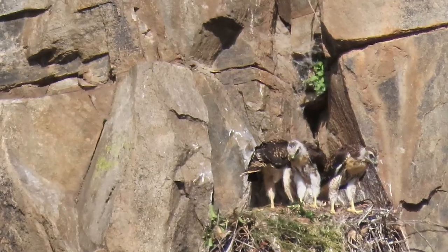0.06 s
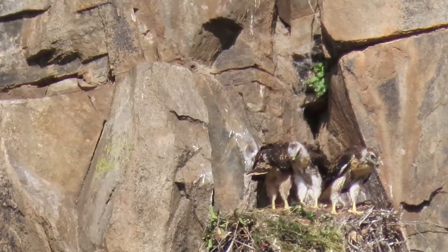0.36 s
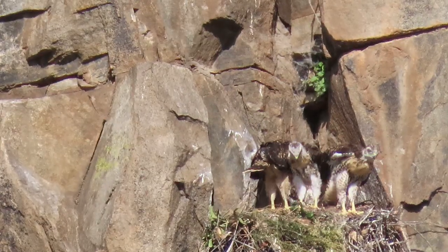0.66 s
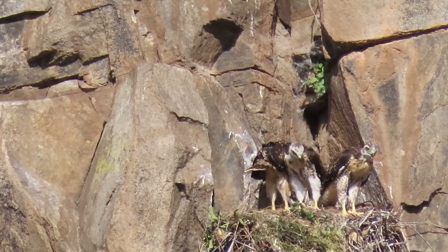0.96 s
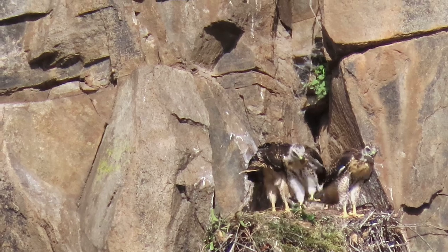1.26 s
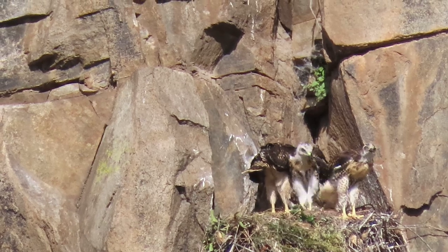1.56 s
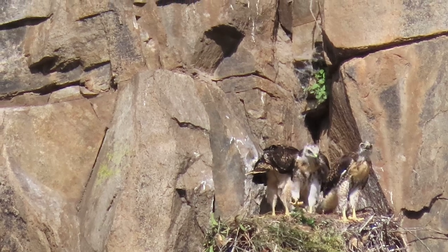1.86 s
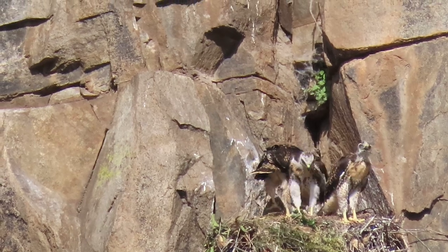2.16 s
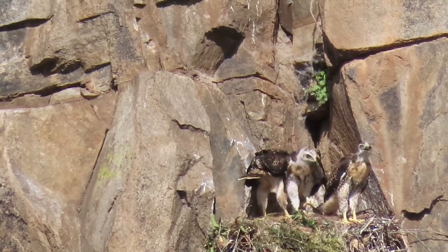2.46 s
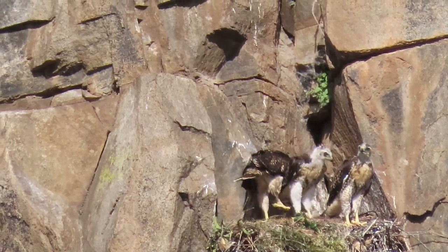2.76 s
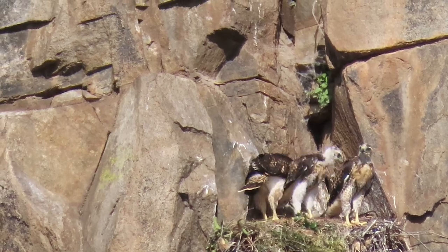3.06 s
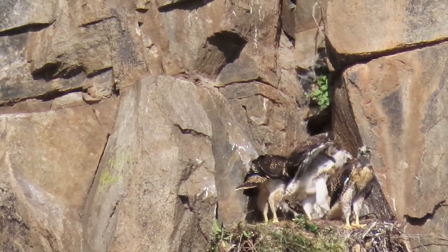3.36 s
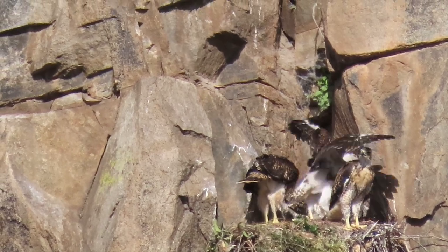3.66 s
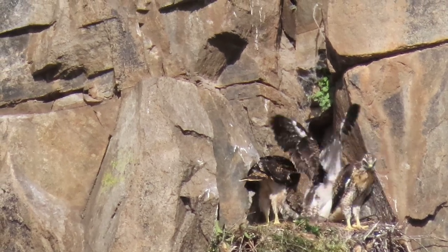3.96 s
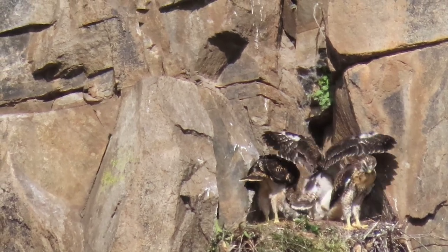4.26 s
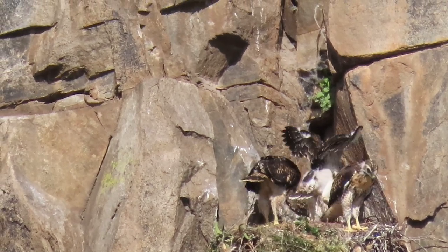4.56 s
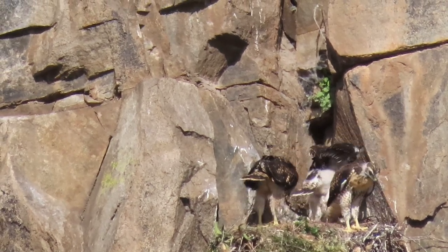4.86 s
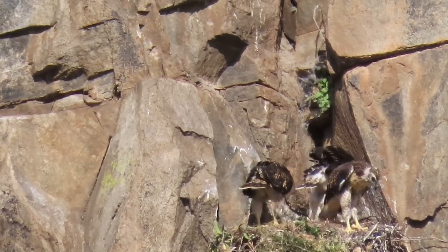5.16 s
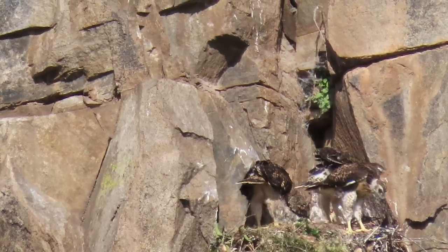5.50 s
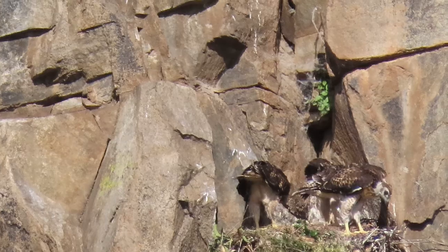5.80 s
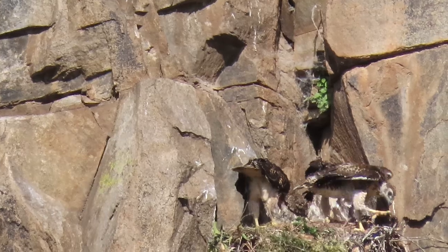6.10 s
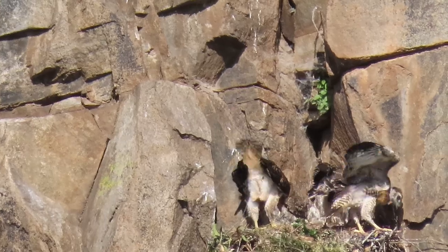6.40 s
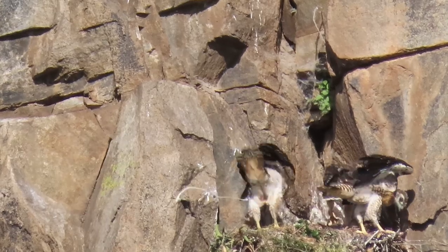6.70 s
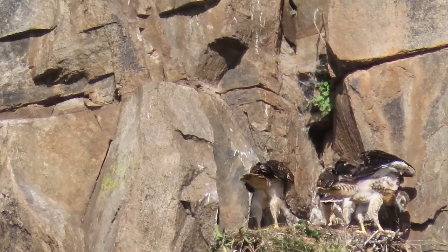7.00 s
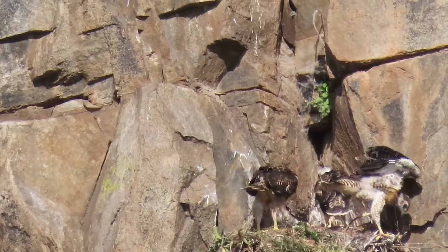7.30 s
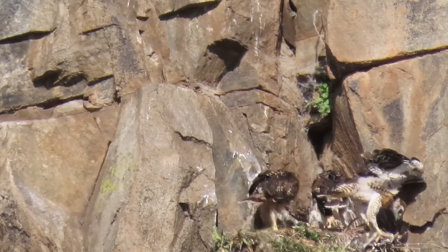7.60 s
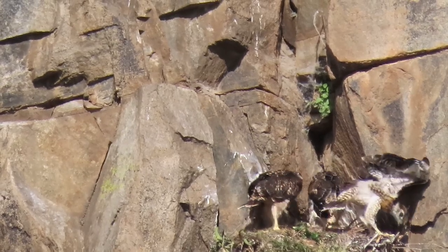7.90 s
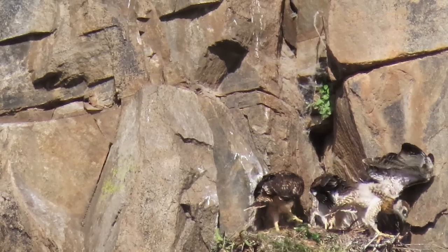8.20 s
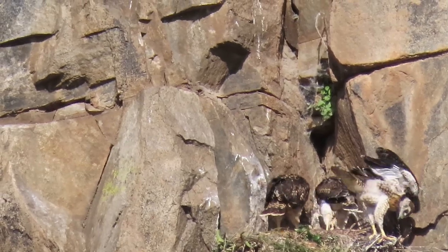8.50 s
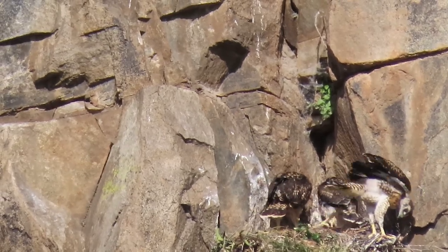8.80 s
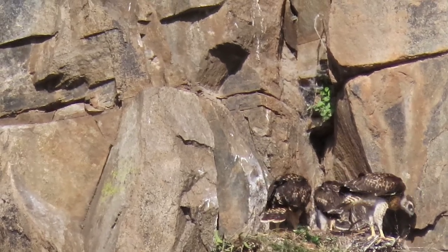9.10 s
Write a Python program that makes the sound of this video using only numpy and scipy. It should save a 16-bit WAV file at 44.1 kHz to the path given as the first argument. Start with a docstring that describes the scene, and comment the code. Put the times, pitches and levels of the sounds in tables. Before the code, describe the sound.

Distant traffic rushes steadily outdoors while a breeze buffets the microphone in low puffs. Small songbirds twitter in separate bursts, their thin whistles echoing lightly off a rock face. A soft singer comes first, then a dull knock, perhaps a wing flap, as a louder bird sings over distant chatter. The nearest bird follows with a quick run of chirrups, and a strong wind puff thuds just before the end.

```python
"""Distant traffic rushes and drones throughout, and a breeze buffets the microphone in low puffs.
Small songbirds twitter below a rock face, which scatters their thin, gliding whistles back.
A soft singer enters after a second; a louder one follows over distant chatter, and near 4 s come
a dull knock and a faint hollow tone, perhaps a wing flap. The nearest bird sings from about 7 to 8 s,
and the strongest puff thuds just before the end."""
import sys
import numpy as np
from scipy import signal
from scipy.fft import rfft, irfft, next_fast_len
from scipy.io import wavfile
from scipy.ndimage import uniform_filter1d

SR = 44100
rng = np.random.default_rng(int(sys.argv[2]) if len(sys.argv) > 2 else 0)


def file_out(sig):
    """Save sig as 16-bit WAV at sys.argv[1]."""
    # one column per channel
    cols = np.atleast_2d(sig).T
    # limit, then scale
    lim = np.clip(cols, -1, 1)
    pcm = np.round(lim * 32767).astype(np.int16)
    wavfile.write(sys.argv[1], SR, pcm)


N = 407925
TIME = np.arange(N) / SR
SIDES = np.array([[.5], [-.5]])  # splits a difference evenly between left and right


def from_db(db):
    """Amplitude ratio: tenfold for every 20 dB."""
    return 10 ** (np.asarray(db) / 20)


def unit_rms(x):
    """Normalisation to unit mean power."""
    return x / np.sqrt(np.mean(x ** 2) + 1e-20)


def at_hz(points, hz):
    """Interpolation of a table along a logarithmic frequency axis."""
    table_hz, value = np.transpose(points)
    return np.interp(np.log(hz + 1e-3), np.log(table_hz), value)


def band(x, low_hz, high_hz):
    """Butterworth band-pass filtering."""
    return signal.sosfilt(signal.butter(2, [low_hz, high_hz], "band", fs=SR, output="sos"), x)


def drift(corner_hz, size=N, control_hz=4000):
    """Random modulation: low-passed noise with an rms near 1."""
    noise = rng.standard_normal(int(size / SR * control_hz) + 2 * control_hz)
    pole = np.exp(-2 * np.pi * corner_hz / control_hz)
    slow = unit_rms(signal.lfilter([1], [1, -2 * pole, pole * pole], noise))
    settled = slow[control_hz:]
    return np.interp(np.arange(size) / SR * control_hz, np.arange(len(settled)), settled)


def stereo_noise(db_at, correlation):
    """Partial coherence: mid and side noise mix into two coloured channels of rms 1."""
    size = next_fast_len(N)
    hz = np.fft.rfftfreq(size, 1 / SR)
    mid, side = rfft(rng.standard_normal((2, size)))
    alike = np.clip(at_hz(correlation, hz), 0, .999)
    both = np.sqrt(1 + alike) * mid + np.sqrt(1 - alike) * side * [[1], [-1]]
    return unit_rms(irfft(both * from_db(db_at(hz)), size)[:, :N])


def add(out, start_s, sound):
    """Superposition of a sound on the mix from its starting time."""
    i = int(np.clip(start_s * SR, 0, N - 1))
    out[..., i:i + sound.shape[-1]] += sound[..., :N - i]


# Spectra of the traffic's rush and the air's hiss. Each row: frequency in Hz, relative density in dB.
TRAFFIC_SPECTRUM = [(24, -32), (40, -10.5), (90, -3), (123, -5.5), (230, -6.5), (283, -9), (393, -10),
                    (574, -11.5), (745, -12.5), (812, -9), (949, -12), (1070, -14), (2500, -30),
                    (3250, -41.5), (5500, -120)]
AIR_SPECTRUM = [(1180, -8.5), (2000, -0.5), (4240, -5.5), (4610, -9.5), (5190, -10), (6350, -11.5),
                (10600, -21), (13400, -25.5), (15000, -32)]
# Coherence of the background. Each row: frequency in Hz, left-right correlation from 0 to 1.
BACKGROUND_CORRELATION = [(60, 0.97), (130, 1), (290, 0.61), (640, 0.82), (1400, 0.64), (3100, 0.47),
                          (6800, 0.27), (14000, 0.56)]
# Drones of the traffic. Each row: centre in Hz, approximate bandwidth in Hz, median level in dB.
TRAFFIC_DRONES = [(279, 12.5, -61.5), (823, 94, -58), (575, 46, -64), (1604, 400, -62)]


def traffic_and_air(traffic_db=-47.5, air_db=-56.0, sway_db=3.0):
    """Incoherent sources add in power: far traffic, its wavering drones and the hiss of open air."""
    traffic = stereo_noise(lambda hz: at_hz(TRAFFIC_SPECTRUM, hz), BACKGROUND_CORRELATION)
    air = stereo_noise(lambda hz: at_hz(AIR_SPECTRUM, hz), BACKGROUND_CORRELATION)
    out = from_db(traffic_db) * traffic + from_db(air_db) * air
    for centre_hz, width_hz, db in TRAFFIC_DRONES:
        peak_db = lambda hz: -20 * np.log10(1 + ((hz - centre_hz) / (0.69 * width_hz)) ** 2)
        out += from_db(db + sway_db * drift(16.5)) * stereo_noise(peak_db, BACKGROUND_CORRELATION)
    return out


# A breeze that freshens, with one lull. Each row: time in seconds, relative level in dB.
BREEZE_LEVELS = [(0, -62), (3.9, -44), (4.7, -61), (6.3, -47), (9.25, -47.5)]
# Gusts riding on it. Each row: start in seconds, hold in seconds, relative level in dB.
WIND_GUSTS = [(0.352, 0.21, -51), (0.84, 0.19, -46), (1.385, 0.2, -48.5), (2.377, 0.22, -50.5),
              (2.975, .16, -35.5), (3.193, 0.12, -43.5), (3.532, 0.28, -49), (3.98, 0.26, -38.5),
              (5.32, 0.091, -44), (5.611, 0.063, -44.5), (6.485, 0.354, -43), (7.425, 0.17, -48),
              (8.24, 0.095, -44.5), (8.596, 0.14, -47), (8.9, 0.2, -41)]
# Spectrum of the buffeting. Each row: frequency in Hz, relative density in dB.
BUFFET_SPECTRUM = [(15, -31), (28, -2.5), (45, 2.5), (80, -2), (120, -8.5), (180, -15), (280, -27),
                   (500, -40), (1500, -110)]


def turbulence(breeze_db=-1.0, gust_db=4.0, lumpy_db=3.0, attack_s=0.045, release_s=0.038):
    """Turbulent pressure on the microphone makes a lumpy rumble; breeze and gusts add in power."""
    power = from_db(np.interp(TIME, *np.transpose(BREEZE_LEVELS)) + breeze_db) ** 2
    for start_s, hold_s, db in WIND_GUSTS:
        outside_hold = np.maximum((start_s - TIME) / attack_s, (TIME - start_s - hold_s) / release_s)
        power += (from_db(db + gust_db) * np.exp(-np.clip(outside_hold, 0, 20))) ** 2
    strength = np.sqrt(power) * from_db(lumpy_db * drift(13.5))
    correlation = [(50, 1.0), (100, 0.93), (200, 0.41)]
    return strength * stereo_noise(lambda hz: at_hz(BUFFET_SPECTRUM, hz), correlation)


# Eddies striking the microphone. Each row: centre in seconds, relative level in dB, pitch in Hz.
EDDIES = [(0.346, -26, 119), (0.423, -30.5, 149), (0.845, -29.5, 115), (0.962, -24.5, 83), (1.118, -28, 73),
          (1.306, -29, 122), (1.389, -26, 58.4), (1.407, -28, 120), (1.433, -26, 84), (2.385, -22, 101.6),
          (2.548, -24.5, 107), (2.572, -33.5, 70), (2.825, -32, 119), (2.955, -21, 150), (2.979, -17, 92),
          (3.055, -26, 62), (3.101, -17.5, 51), (3.251, -31, 117), (4.011, -26, 45.6), (4.092, -22, 111),
          (4.14, -22.5, 71.1), (4.369, -26.5, 71.4), (5.316, -31, 88), (5.362, -29, 83), (5.421, -28, 62),
          (5.638, -30, 76), (5.735, -29.5, 61), (6.514, -28, 53.5), (6.696, -24.5, 67.6), (6.876, -30, 76),
          (7.462, -29.5, 90.2), (8.331, -25.5, 71), (8.89, -6.5, 83.8), (8.957, -28, 92)]


def puffs(spread_cycles=0.41, gain_db=1.04, port_lag_s=0.00036, ripple_db=-19.0, pan_db=2.3):
    """Each eddy is a pressure pulse reaching one microphone port first, with a ripple in antiphase."""
    out, t = np.zeros((2, N)), np.arange(-SR // 15, SR // 15) / SR
    for centre_s, db, hz in EDDIES:
        phase = 2 * np.pi * (rng.random() + hz * port_lag_s * SIDES * rng.choice([-1, 1]))
        ripple = unit_rms(SIDES * band(rng.standard_normal(len(t)), 1.67 * hz, 2.1 * hz))
        envelope = np.exp(-.5 * (t * hz / spread_cycles) ** 2)
        pulse = envelope * (np.cos(2 * np.pi * hz * t + phase) + from_db(ripple_db) * ripple)
        add(out, centre_s + t[0], from_db(db + gain_db + pan_db * SIDES) * pulse)
    return out


def faint_hollow_tone(centre_s=4.06, spread_s=0.038, tone_hz=755, width_hz=42, level_db=-48):
    """Narrow-band noise is heard as pitch: a faint hollow tone swells briefly near 4 s."""
    tone = unit_rms(band(rng.standard_normal(N), tone_hz - width_hz / 2, tone_hz + width_hz / 2))
    return tone * from_db(level_db) * np.exp(-.5 * ((TIME - centre_s) / spread_s) ** 2)


# One dry knock: start in seconds, relative level in dB.
DRY_KNOCK = (3.931, -37)
# Its tones. Each row: frequency in Hz, relative level in dB, time to decay by 60 dB in seconds.
KNOCK_TONES = [(560, 2.5, 0.041), (715, -7, .02), (1130, -1, 0.024), (1510, -8, 0.021)]


def knock(high_hz=2600):
    """Fast-decaying tones fuse into a short, dull, dry knock close by, perhaps a wing flap."""
    out, t = np.zeros(N), np.arange(SR // 10) / SR
    start_s, level_db = DRY_KNOCK
    tones = sum(from_db(level_db + db - 60 * t / t60) * np.sin(2 * np.pi * hz * t)
                for hz, db, t60 in KNOCK_TONES)
    add(out, start_s, band(tones, 200, high_hz))
    return out


def rock_echo(x, correlation=0.79, low_hz=2300):
    """Diffuse reverberation: ground and brush answer first, then the rock face and further rocks."""
    t = np.arange(SR) / SR

    def tail_power(db, t60, onset_s):
        """Exponential decay of reflected power after a smooth build-up."""
        tail = from_db(-60 * t / t60) * (1 - np.exp(-(t / onset_s) ** 2))
        return (from_db(db) * unit_rms(tail)) ** 2

    reflections = rng.standard_normal((3, SR)) * (rng.random((3, SR)) < .1)
    paths = np.sqrt(correlation) * reflections[2] + np.sqrt(1 - correlation) * reflections[:2]
    ground = tail_power(db=-10, t60=0.069, onset_s=.003)
    rock_face = tail_power(db=-15, t60=.3, onset_s=.04)
    far_rocks = tail_power(db=-10, t60=0.74, onset_s=.03)
    response = unit_rms(paths) * np.sqrt(2 * (ground + rock_face + far_rocks) / SR)
    # Rough rock scatters short waves best.
    response = signal.sosfilt(signal.butter(2, low_hz, "high", fs=SR, output="sos"), response)
    return signal.fftconvolve(x, response, axes=1)[:, :N]


def ground_bounce(x, delay_s=.0027, level_db=-12):
    """Comb filtering: interference with the ground reflection makes each glide swell and dip."""
    reflection = np.array([np.interp(TIME - delay_s, TIME, channel, left=0) for channel in x])
    return x + from_db(level_db) * reflection


def brush_scatter(x, count=24, spread_s=0.02, level_db=-11.5):
    """Multipath interference: faint early reflections off twigs and stones roughen each glide."""
    delays_s = .002 + spread_s * rng.random(count)
    copies = sum(np.pad(x, ((0, 0), (int(s * SR), 0)))[:, :N] for s in delays_s)
    return x + from_db(level_db) * copies / np.sqrt(count)


# Turning points of each syllable. Each row: time in seconds, pitch in Hz, both before scaling.
PITCH_CONTOURS = { "arch": [(0, 4374), (.014, 4660), (.021, 5015), (.033, 4620), (.053, 2720), (.061, 2750),
                  (.072, 3400)], "dip": [(0, 5750), (.016, 5130), (.04, 2738), (.05, 2650), (.069, 4120)],
                  "long_slide": [(0, 6950), (.028, 5700), (.064, 4650), (.097, 3520), (.15, 2440)],
                  "hooked_slide": [(0, 6880), (.06, 4640), (.098, 3300), (.115, 3050), (.14, 3310)],
                  "zigzag": [(0, 2727), (.018, 3900), (.031, 5350), (.041, 3385), (.05, 3150), (.075, 4590),
                  (.084, 4650)], "slur": [(0, 6300), (.024, 5270), (.052, 4640), (.088, 3400),
                  (.115, 2830)], "crest": [(0, 3233), (.025, 3763), (.062, 2550)], "scoop": [(0, 4580),
                  (.048, 3610), (.054, 4250), (.076, 4400), (.098, 4630)], "hook": [(0, 4228), (.018, 4520),
                  (.035, 3600), (.049, 4060)], "fall": [(0, 4100), (.022, 3450), (.05, 3050)],
                  "swell": [(0, 3870), (.07, 4480), (.1, 3300), (.118, 3800)], "droop": [(0, 3220),
                  (.018, 3350), (.042, 3200), (.077, 2700)], "peak": [(0, 4985), (.019, 6250),
                  (.036, 4750)], "flick": [(0, 5810), (.035, 4530)], "lilt": [(0, 3800), (.022, 4300),
                  (.042, 5150), (.075, 5300)], "bow": [(0, 4200), (.021, 4530), (.036, 5320), (.054, 5420),
                  (.072, 3750)], "ladle": [(0, 3740), (.017, 2910), (.046, 3080)], "tsip": [(0, 5340),
                  (.038, 5010)], "peep": [(0, 5140), (.025, 5380), (.042, 5950)], "whistle": [(0, 4470),
                  (.045, 4360), (.145, 4330)], "pip": [(0, 4345), (.062, 4320)], "held": [(0, 3280),
                  (.03, 3560), (.042, 3790), (.13, 3750)], "bend": [(0, 4050), (.035, 4170), (.08, 3980)], }
# Swells within a syllable. Each row: time in seconds before stretching, relative level in dB.
EFFORT_CONTOURS = {"arch": [(0, -7), (.02, -1), (.036, 1), (.053, -4), (.072, -6)], "dip": [(0, -3.5),
                   (.02, 0.5), (.045, -3.5), (.069, 3)], "long_slide": [(0, -5), (.04, -0.5), (.09, -0.5),
                   (.15, 0)], "hooked_slide": [(0, -7), (.055, -1), (.1, -5.5), (.14, -9)], "peak": [(0, 4),
                   (.012, 4.5), (.019, -5), (.028, -4)], "droop": [(0, -1), (.028, 1), (.045, -8),
                   (.06, -0.5)], "hook": [(0, -3), (.018, -2.5), (.034, 2)], "slur": [(0, -3), (.03, -0.5),
                   (.075, 0), (.115, -0.5)]}
# The birds' voices. Each row: throat resonance in Hz, its half-width in Hz, attack, release and
# turning time in seconds, flutter in dB, tremble as a share of pitch, loss in dB per doubling of
# a fast glide's speed.
BIRD_VOICES = {"near": (4400, 1300, 0.008, 0.0075, 0.0025, 2.8, 0.0087, 1.0),
               "middle": (4000, 1100, 0.0095, 0.014, 0.0022, 3.35, 0.0125, 1.6),
               "soft": (3570, 1300, 0.01, 0.0092, 0.0018, 2.6, 0.0063, 2.3),
               "far": (3600, 2300, 0.0046, 0.0085, 0.0015, 3.1, 0.0071, 0.71),
               "hidden": (3600, 2300, .012, .012, .002, 3, .018, .7),
               "piping": (3800, 2200, .012, .015, .003, 2.5, .003, .5)}


def syllable(shape, voice, pitch, stretch, lag_samples, easy_sweep_hz_per_s=9000):
    """A frequency-modulated whistle, loudest at the throat's resonance and where the pitch lingers."""
    throat_hz, width_hz, attack_s, release_s, turn_s, flutter_db, tremble, loss_db = BIRD_VOICES[voice]
    points_s, points_hz = np.transpose(PITCH_CONTOURS[shape])
    t = np.arange(0, points_s[-1] * stretch, 1 / SR)
    glide = np.interp(t, points_s * stretch, points_hz)
    for _ in range(2):  # round the corners
        glide = uniform_filter1d(glide, size=1 + int(2 * turn_s * SR), mode="nearest")
    haste = np.log2(1 + np.abs(np.gradient(glide)) * SR / easy_sweep_hz_per_s)
    haste = uniform_filter1d(haste, size=SR // 80, mode="nearest")
    hz = pitch * glide * (1 + tremble * drift(128, size=len(t)))
    ramp = np.clip(np.minimum(t / attack_s, (t[-1] - t) / release_s), 0, 1)
    resonance = 1 / (1 + ((hz - throat_hz) / width_hz) ** 2)
    effort_db = np.interp(t / stretch, *np.transpose(EFFORT_CONTOURS.get(shape, [(0, 0)])))
    flutter = drift(70, size=len(t))
    swell_db = effort_db + flutter_db * (flutter - flutter.mean()) - loss_db * (haste - haste.mean())
    envelope = np.sin(np.pi / 2 * ramp) ** 2 * resonance * from_db(swell_db)
    phase = 2 * np.pi * (np.cumsum(hz) - hz * lag_samples * SIDES) / SR
    return envelope * (np.sin(phase) + from_db(-44) * np.sin(2 * phase))


def far_twitter(count=260, level_db=-63, spread_db=4):
    """Partial masking: the random twitter of far birds barely rises above the hiss of the air."""
    out, shapes = np.zeros((2, N)), ["peak", "fall", "tsip", "lilt", "hook", "arch", "crest"]
    for k, (jitter, faintness, height, length, side) in enumerate(rng.random((count, 5))):
        note = syllable(shapes[k % len(shapes)], "far", pitch=.76 + .34 * height,
                        stretch=0.67 + .5 * length, lag_samples=2 * side - 1)
        add(out, (k + jitter) / count * N / SR, from_db(level_db - spread_db * faintness) * note)
    return out


# A distant bird's chatter: start in seconds, end in seconds, relative level in dB.
CHATTER_SPAN = (3.45, 6.5, -56.5)


def far_chatter(count=24, spread_db=3, pitch_range=0.159):
    """Timing jitter makes an uneven run of high peaks and short downward flicks."""
    out, shapes = np.zeros((2, N)), ["peak", "flick", "flick"]
    start_s, end_s, level_db = CHATTER_SPAN
    for k, (jitter, faintness, height, length, side) in enumerate(rng.random((count, 5))):
        note = syllable(shapes[k % len(shapes)], "far", pitch=1 + pitch_range * (height - .5),
                        stretch=0.525 + .5 * length, lag_samples=2 * side - 1)
        onset_s = start_s + (end_s - start_s) * (k + jitter) / count
        add(out, onset_s, from_db(level_db - spread_db * faintness) * note)
    return out


def far_trill(start_s=4.918, period_s=0.09, level_db=-50.5, count=4):
    """Periodic repetition of one high syllable makes a trill, returned as rows of the song."""
    return [(start_s + k * period_s, "far", "peak", level_db, 1) for k in range(count)]


# Where the birds sit. Each row: lag of the left channel in samples, left-right difference in dB,
# direct gain in dB, echo gain in dB.
BIRD_PERCHES = {"near": (1.62, -1.5, -0.42, 0.049), "middle": (-1.7, 0.81, 0.7, -0.036),
                "soft": (-0.12, 0.02, 0, -0.92), "far": (1, -0.039, 0, .5), "piping": (1.5, 3, 1, -6),
                "hidden": (1.5, 0, 3, 6)}
# Syllables sung together. Each row: delay into the motif in seconds, syllable, accent in dB.
SONG_MOTIFS = { "chirrup": [(0, "arch", -1.5), (.074, "dip", -4)], "seesaw": [(0, "zigzag", -2.5),
               (.151, "slur", -3)], }
# The song. Each row: start in seconds, bird, motif or syllable, relative level in dB, pitch factor.
BIRD_SONG = [ (.185, "far", "tsip", -55, 0.97), (.575, "far", "lilt", -61, 0.98),
             (0.809, "far", "bow", -54.5, 0.99), (.93, "far", "tsip", -59, .87),
             (1.03, "far", "peep", -58, 1.02), (1.14, "far", "peep", -56, 1.05),
             (1.249, "soft", "scoop", -51, 1.02), (1.465, "soft", "hook", -48, 1.07),
             (1.597, "soft", "scoop", -46.5, 1.02), (1.785, "soft", "hook", -45.5, 1.04),
             (1.884, "soft", "hook", -46, 1.01), (1.925, "soft", "fall", -46, 0.98),
             (2.041, "soft", "swell", -53, 0.95), (2.195, "soft", "droop", -47.5, 0.99),
             (2.357, "soft", "droop", -46.5, 0.98), (1.39, "far", "peep", -61, 0.77),
             (1.735, "far", "tsip", -56, .9), (2.195, "far", "tsip", -55, .98),
             (2.345, "far", "peep", -58, 0.89), (2.549, "hidden", "fall", -53, 0.93),
             (2.89, "hidden", "swell", -59.5, 0.97), (2.99, "hidden", "peep", -60, 0.69),
             (3.066, "hidden", "swell", -66.5, 0.92), (3.097, "far", "tsip", -55, 1),
             (3.125, "hidden", "hook", -60, 0.76), (3.568, "middle", "fall", -50, 0.99),
             (3.625, "far", "tsip", -58, 0.94), (3.777, "middle", "seesaw", -43.5, 0.99),
             (4.105, "hidden", "fall", -52, 0.88), (4.196, "middle", "seesaw", -41, 1),
             (4.31, "hidden", "droop", -55, 1.1), (4.52, "hidden", "crest", -53, 0.99),
             (4.61, "middle", "zigzag", -41.5, 0.99), (4.763, "middle", "slur", -42.5, 1.01),
             (4.025, "far", "flick", -62, 1.1), (4.48, "far", "flick", -57, 1.05),
             (4.667, "far", "swell", -72, .95), (4.835, "far", "flick", -53, 1.3),
             (4.888, "far", "fall", -61, 1.2), (5.275, "far", "fall", -58, 0.95),
             (4.94, "hidden", "crest", -53, 0.87), (5.02, "middle", "seesaw", -40, 0.96),
             (5.324, "middle", "crest", -42.5, 1.01), (5.505, "piping", "whistle", -58, 1),
             (5.662, "piping", "pip", -56.5, 1), (5.815, "piping", "ladle", -52, .99),
             (5.745, "far", "swell", -57.5, 0.99), (5.91, "hidden", "tsip", -60, 0.84),
             (6.209, "far", "peep", -57.5, 1.05), (6.64, "hidden", "droop", -59.5, 1.03),
             (6.85, "hidden", "fall", -55, 0.99), (6.95, "far", "peep", -53, .9),
             (6.782, "near", "chirrup", -46, 0.98), (6.978, "near", "arch", -41.5, 1),
             (7.052, "near", "dip", -39, 0.98), (7.132, "near", "arch", -50.5, 0.96),
             (7.182, "near", "long_slide", -37, 1), (7.394, "near", "chirrup", -32.5, 0.98),
             (7.594, "near", "chirrup", -33, 0.98), (7.797, "near", "hooked_slide", -33, 1.016),
             (8.012, "near", "chirrup", -33.5, 0.97), (8.21, "far", "fall", -57, 0.9),
             (8.376, "far", "droop", -55, 0.98), (8.53, "far", "flick", -60, .93),
             (8.72, "far", "tsip", -57, .96), (8.8, "hidden", "peep", -58, 0.8),
             (8.885, "hidden", "fall", -57, 1.2), (9.07, "piping", "bend", -59, 1),
             (9.15, "piping", "held", -55, 1), ]


def songbirds():
    """Time and level differences place each bird; returns the direct sound and that sent to the rocks."""
    direct, to_rocks = np.zeros((2, 2, N))
    for start_s, bird, motif, db, pitch in BIRD_SONG + far_trill():
        lag_samples, pan_db, direct_db, echo_db = BIRD_PERCHES[bird]
        for delay_s, shape, accent_db in SONG_MOTIFS.get(motif, [(0, motif, 0)]):
            note = syllable(shape, bird, pitch, stretch=0.99, lag_samples=lag_samples)
            note *= from_db(db + accent_db + pan_db * SIDES)
            add(direct, start_s + delay_s, from_db(direct_db) * note)
            add(to_rocks, start_s + delay_s, from_db(echo_db) * note)
    return direct, to_rocks


def scene(birds_db=-2.5, twitter_db=0.5, far_echo_db=4.0):
    """Linear superposition of birds, echo, wind, a hollow tone, a knock and the far background."""
    direct, to_rocks = songbirds()
    twitter, chatter = far_twitter(), far_chatter()
    echo = rock_echo(to_rocks + from_db(far_echo_db) * (twitter + chatter))
    song = brush_scatter(ground_bounce(direct))
    birds = from_db(birds_db) * (song + from_db(twitter_db) * twitter + chatter + echo)
    wind = puffs() + turbulence()
    return birds + wind + faint_hollow_tone() + knock() + traffic_and_air()


def record(dry, low_hz=18, high_hz=15200):
    """Band limiting: the microphone sheds the deepest rumble, and the top treble is cut steeply."""
    thinned = signal.sosfilt(signal.butter(2, low_hz, "high", fs=SR, output="sos"), dry)
    return signal.sosfilt(signal.ellip(10, .1, 80, high_hz, fs=SR, output="sos"), thinned)


dry = scene()
out = record(dry)
file_out(out)
```